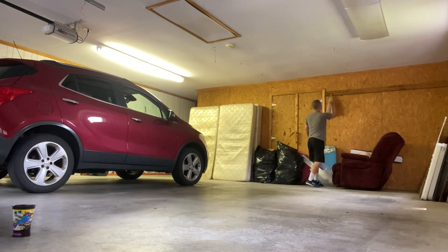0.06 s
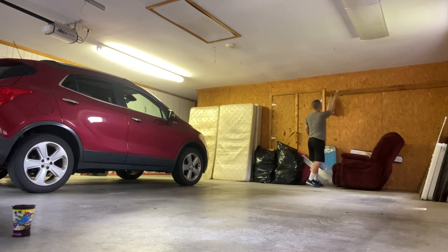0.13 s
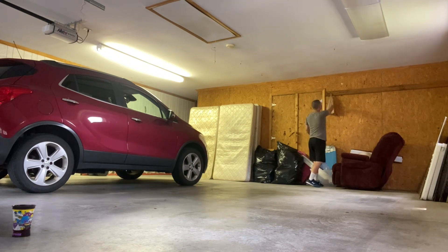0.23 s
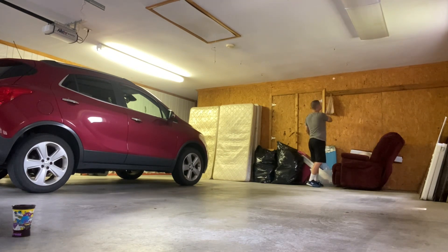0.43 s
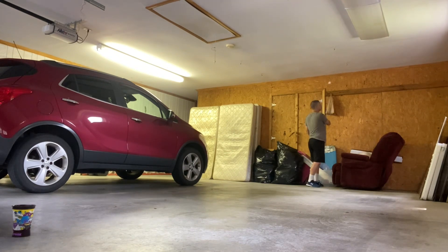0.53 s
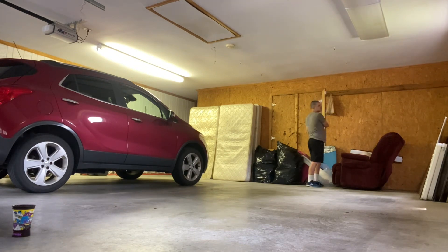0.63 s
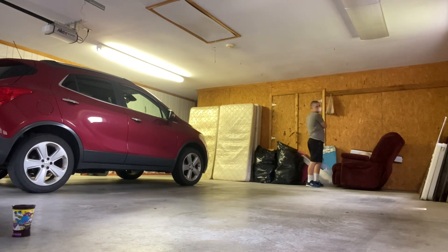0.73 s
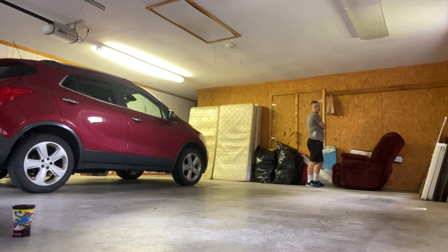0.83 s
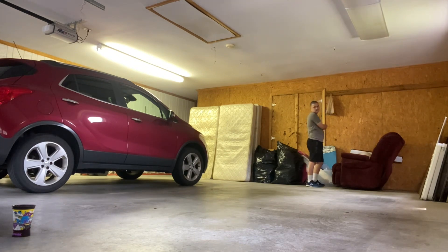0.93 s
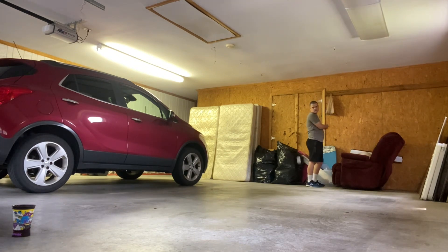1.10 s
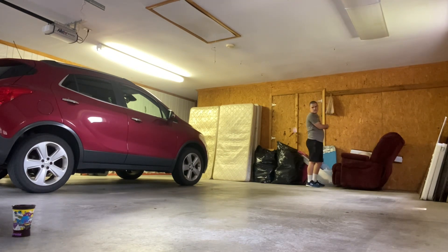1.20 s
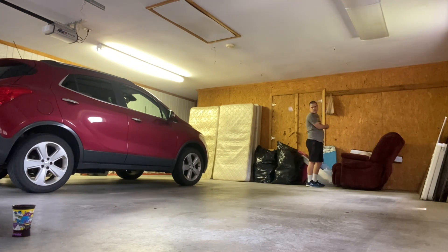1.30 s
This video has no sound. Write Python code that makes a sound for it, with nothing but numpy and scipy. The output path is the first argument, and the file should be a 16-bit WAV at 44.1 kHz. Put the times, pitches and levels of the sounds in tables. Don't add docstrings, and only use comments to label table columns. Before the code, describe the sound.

After a brief hissy fragment with two faint ticks, a hard plastic ball whacks a thin panel, reverberating through a bare garage; then comes a soft shoe scuff and a drier floor click, over low room rumble.

```python
import sys
import numpy as np
from scipy import signal
from scipy.fft import rfft, irfft
from scipy.io import wavfile
from scipy.ndimage import uniform_filter1d

SR = 44100
rng = np.random.default_rng(int(sys.argv[2]) if len(sys.argv) > 2 else 0)


def digitize_waveform(pressure):
    field = np.atleast_2d(pressure).T
    bounded = np.clip(field, -1, 1)
    quanta = np.round(bounded * 32767).astype(np.int16)
    wavfile.write(sys.argv[1], SR, quanta)


def natural_amplitude(level_db):
    exponent = np.asarray(level_db, float) / 20
    return 10 ** exponent


N = 59535

# t/s, level/dB, left-right/dB
PANEL_ARRIVALS = [
    (.2290, -33.5, 16.5),
    (.2301, -15.5, 5),
    (.2365, -31, 5.5),
    (.2388, -26, 11),
    (.2420, -20, -7.5),
    (.2458, -35.5, 2.5),
]
# t/s, level/dB, left-right/dB
FLOOR_ARRIVALS = [
    (1.0210, -25, -3),
    (1.0221, -29, 10),
    (1.0273, -36, 2),
    (1.0288, -38, 3),
    (1.0368, -38, 0),
]


def at_hz(points, hz):
    table_hz, value = np.array(points)[:, 0], np.array(points)[:, 1]
    return np.interp(np.log(hz), np.log(table_hz), value)


def drift(rate):
    slow = rng.standard_normal(int(N / SR * 200) + 4)
    return np.interp(np.arange(N) / SR * np.clip(rate, 1, 190), np.arange(len(slow)), slow)


def ring(x, hz, t60):
    r, w = natural_amplitude(-60 / (t60 * SR)), 2 * np.pi * hz / SR
    return signal.lfilter([0, np.sin(w)], [1, -2 * r * np.cos(w), r * r], x + 1e-18)


def diffuse(spectrum, shape, patchy_db):
    # f/Hz, correlation (clipped to 0..1)
    likeness = [(60, 3), (250, 0.2), (600, 0.51), (1200, 1.9), (2500, -6.2), (8000, -0.07)]
    # f/Hz, lead/rad
    lead = [(60, 0.6), (250, 0.59), (520, 2.38), (1050, 4.6), (2500, 2)]
    # f/Hz, left-right/dB
    balance = [(60, 0.5), (170, 1.1), (480, 2.5), (1360, 8.5), (3860, 4.7), (10900, 8.9)]
    hz = np.maximum(np.arange(N // 2 + 1) * SR / N, 1)
    shared, separate = rfft(rng.standard_normal((2, N)))
    alike = np.clip(at_hz(likeness, hz), 0, 1)
    tilt = natural_amplitude(at_hz(balance, hz) / 2)
    left = shared * tilt
    delayed = shared * np.exp(-1j * at_hz(lead, hz))
    right = (alike * delayed + np.sqrt(1 - alike ** 2) * separate) / tilt
    pair = np.array([left, right]) * natural_amplitude(at_hz(spectrum, hz))
    pair = pair / np.std(irfft(pair.mean(0), N))
    out = 0
    for k in range(30):
        share = np.clip(1 - np.abs(3 * np.log2(hz / 20) - k), 0, 1)
        band = irfft(pair * share, N)
        out = out + band * shape(20 * 2 ** (k / 3)) * natural_amplitude(patchy_db * drift(25))
    return out


def rumble():
    # f/Hz, level/dB per Hz
    rumble_colour = [(28, -10.5), (128, -7), (205, -25.5), (530, -18.5), (620, -35.5), (1800, -44.5),
                     (2300, -45.5), (8500, -56)]
    return natural_amplitude(-55.5) * diffuse(rumble_colour, lambda hz: 1, patchy_db=3.0)


def scuff():
    # f/Hz, level/dB per Hz
    scuff_colour = [(710, -27), (1200, -8), (2010, -7), (2420, 1.5), (6760, -16), (9000, -44.5),
                    (11700, -75), (19800, -120)]
    peak_s, rise_s, fall_s = 0.895, 0.064, 0.1
    t = np.arange(N) / SR - peak_s
    stroke = np.exp(-(t / np.where(t < 0, rise_s, fall_s)) ** 2)
    return natural_amplitude(-64) * diffuse(scuff_colour, lambda hz: stroke, patchy_db=0.5)


def garage(start_s, level_db, build_s, spectrum):
    # f/Hz, t60/s
    decay = [(90, .9), (200, .55), (500, .66), (1300, .62), (1750, .62), (2200, .84), (2700, .64),
             (9000, .5)]
    late_db, late_t60_s = -37, 2.06
    since = np.arange(N) / SR - start_s
    t = np.maximum(since, 0)

    def shape(hz):
        smear_db = -18 + 2.5 * np.log2(hz / 1500)
        smear = natural_amplitude(smear_db) * np.exp(-(since / 0.011) ** 2) * (400 < hz < 7000)
        build = 1 - np.exp(-(t / (build_s + 2.1 / hz)) ** 2)
        die = natural_amplitude(-60 * t / at_hz(decay, hz)) + natural_amplitude(late_db - 60 * t / late_t60_s)
        return smear + build * die

    return natural_amplitude(level_db) * diffuse(spectrum, shape, patchy_db=1.0)


def sheet():
    # f/Hz, level/dB, t60/s
    sheet_modes = [(1018, -43, 0.31), (1693, -31.5, 0.55), (1842, -45, 0.5), (2000, -36, .6),
                   (2100, -43.5, 0.23), (2440, -55, .5), (3220, -47, .4), (5250, -57, 0.14)]
    out = 0
    for hz, db, t60 in sheet_modes:
        click = np.zeros((2, N))
        for s, blow_db in (PANEL_ARRIVALS[2][0], 0), (FLOOR_ARRIVALS[2][0], -13):
            at = int(s * SR) + rng.integers(0, 200, 2)
            click[[0, 1], at] = natural_amplitude(db + blow_db + np.array([1.5, -1.5]))
        out = out + ring(click, hz, t60)
    return out


def panel():
    # f/Hz, level/dB, t60/s
    panel_modes = [(163.4, -8.5, 0.56), (182.8, -1.5, 0.32), (215.4, -2.5, 0.54), (257.5, 7, .1),
                   (281, -3.5, 0.28), (325, -8.5, 0.36), (366, -23, .4), (452, -19, 0.69),
                   (548, -7.5, 0.73)]
    push_s, lag_s, push_db = .2325, 0.0004, -21.5
    click = np.zeros((2, N))
    click[0, int(push_s * SR)] = -natural_amplitude(push_db + 2.5)
    click[1, int((push_s + lag_s) * SR)] = -natural_amplitude(push_db)
    boom = sum(natural_amplitude(db) * ring(click, hz, t60) for hz, db, t60 in panel_modes)
    boom = signal.sosfilt(signal.butter(2, [157, 417], "band", fs=SR, output="sos"), boom)
    swell = click[0]
    for _ in range(3):
        swell = ring(swell, 508, .42)
    swell = swell / np.abs(swell).max() * natural_amplitude(2 * drift(28))
    return boom + natural_amplitude(-34) * swell * np.array([[1], [-.45]])


def ball(hits, shell):
    s, db, pan_db = np.transpose(hits)
    out = np.zeros((2, N))
    for k, (hz, width_hz, level_db) in enumerate(shell):
        clicks = np.zeros((2, N))
        own_db = rng.normal(0, 1, (len(s), 3))
        for side in range(2):
            at = ((s + .0003 * side) * SR).astype(int)
            side_db = db + level_db + (1.0 - side) * pan_db + own_db[:, side]
            clicks[side, at] = natural_amplitude(side_db) * (-1) ** k
        t60 = np.log(1000) / (np.pi * width_hz * 1.9)
        for _ in range(3):
            clicks = ring(clicks, hz, t60)
        out += clicks * 700 / (t60 * SR) ** 2
    return signal.sosfilt(signal.butter(2, 300, "high", fs=SR, output="sos"), out)


def earlier_moment():
    # f/Hz, level/dB per Hz
    hiss_colour = [(450, -7), (800, -2.5), (2000, 0), (5000, -11.5), (5900, -16.5), (7000, -4.5),
                   (8400, -10.5), (11000, -7.5)]
    # t/s, level/dB, left-right/dB
    faint_hits = [
        (.0062, -39, 0.0062),
        (.0082, -40, 0),
        (.0200, -40.5, 0),
        (.0220, -55, 0),
    ]
    # f/Hz, width/Hz, level/dB
    faint_shell = [(1180, 210, -4), (1600, 196, 8.5), (1900, 430, -18)]
    hiss = natural_amplitude(-51.5) * diffuse(hiss_colour, lambda hz: 1, patchy_db=2)
    return hiss + ball(faint_hits, faint_shell)


def panel_blow():
    # f/Hz, width/Hz, level/dB
    panel_shell = [(969, 690, -18.5), (1780, 400, 2.5), (3237, 550, -2.5), (4160, 340, -27),
                   (5890, 450, -10), (7800, 790, -17.5), (9320, 550, -14.5)]
    # f/Hz, level/dB per Hz
    panel_tail = [(50, -31.5), (110, -11.5), (190, -4.5), (500, -7.5), (620, -11.5), (2000, -18),
                  (4400, -26), (11000, -41)]
    tail = garage(PANEL_ARRIVALS[0][0], -20.5, 0.002, panel_tail)
    return ball(PANEL_ARRIVALS, panel_shell) + panel() + tail


def floor_blow():
    # f/Hz, width/Hz, level/dB
    floor_shell = [(445, 630, -4.5), (1730, 450, 5), (2390, 1700, -6.5), (3220, 430, -6), (4550, 410, -9),
                   (6760, 430, -12), (8630, 330, -10.5)]
    # f/Hz, level/dB per Hz
    floor_tail = [(150, -16.5), (450, -4), (900, -6.5), (1600, -3), (2200, -4), (5600, -19), (8400, -14),
                  (11000, -15.5)]
    tail = garage(FLOOR_ARRIVALS[0][0], -34, .008, floor_tail)
    return ball(FLOOR_ARRIVALS, floor_shell) + tail


def scene():
    cut_s, fade_out_s, fade_in_s = 0.066, 0.029, 0.035
    t = np.arange(N) / SR
    before = np.clip((cut_s - t) / fade_out_s, 0, 1)
    after = np.clip((t - cut_s) / fade_in_s, 0, 1)
    present = scuff() + sheet() + panel_blow() + floor_blow()
    return (before + after) * rumble() + before * earlier_moment() + after * present


def roll_off(x):
    return signal.sosfilt(signal.butter(12, 11530, fs=SR, output="sos"), x)


def record(dry):
    # f/Hz, level/dB
    mic_colour = [(2250, 0), (2550, -5.5), (3400, 0.5), (4250, -1.5), (4500, -4), (5600, 0), (8700, 0),
                  (9100, -20.5)]
    # f/Hz, level/dB
    top_colour = [(9000, -0.5), (9200, -22.5), (9500, 12.5), (10300, 5), (10600, -17.5), (10900, -10.5),
                  (11100, 6), (11500, -1)]
    # low f/Hz, high f/Hz, share of time shut
    gated = [(9000, 9400, .65), (9400, 9900, .3), (9900, 10500, .35), (10500, 11000, .8),
             (11000, 11500, .6)]
    hz = np.maximum(np.arange(N // 2 + 1) * SR / N, 1)
    heard = rfft(dry) * natural_amplitude(at_hz(mic_colour, hz) + at_hz(top_colour, hz))
    mix = irfft(heard * (hz < gated[0][0]), N)
    for low, high, shut in gated:
        gate = np.repeat(rng.random(N // 2048 + 1) > shut, 2048)[:N]
        band = irfft(heard * (hz >= low) * (hz < high), N)
        mix = mix + band * uniform_filter1d(gate * 1.0, size=700)
    return roll_off(mix)


dry = scene()
out = record(dry)
digitize_waveform(out)
```